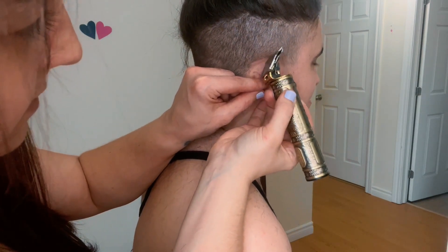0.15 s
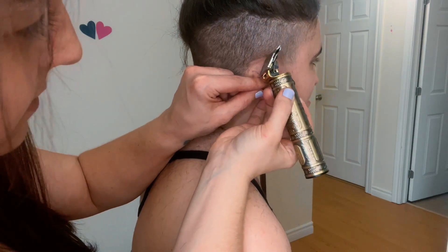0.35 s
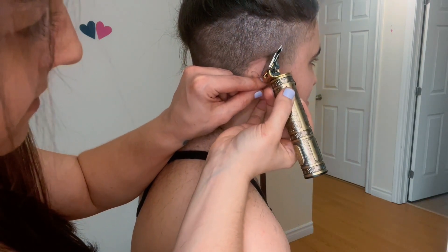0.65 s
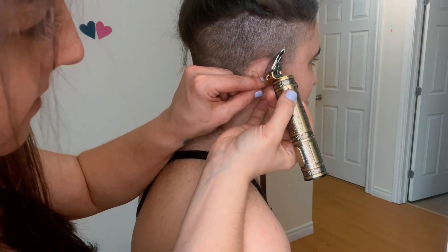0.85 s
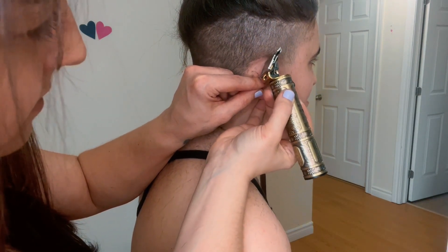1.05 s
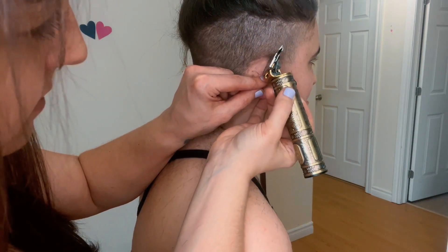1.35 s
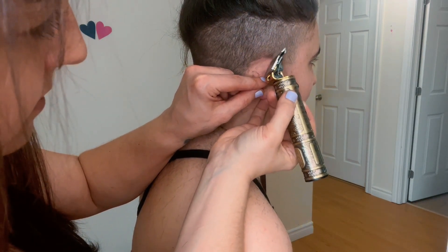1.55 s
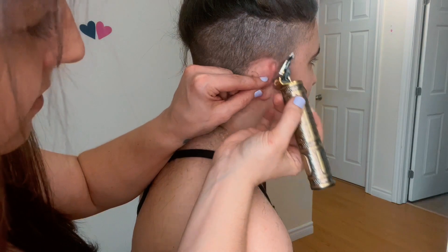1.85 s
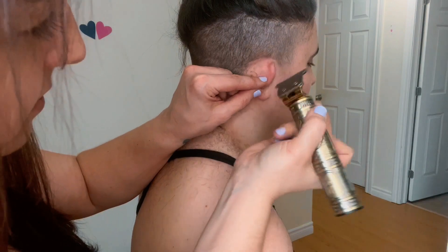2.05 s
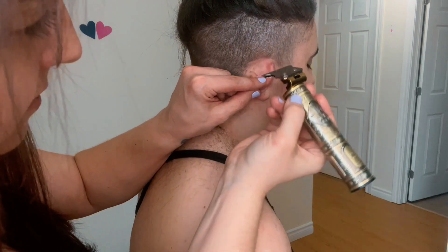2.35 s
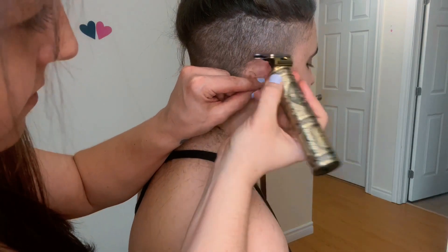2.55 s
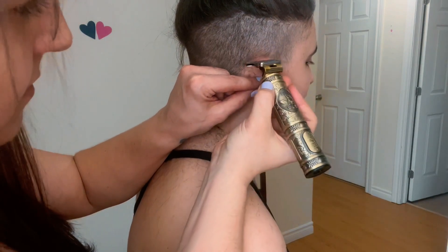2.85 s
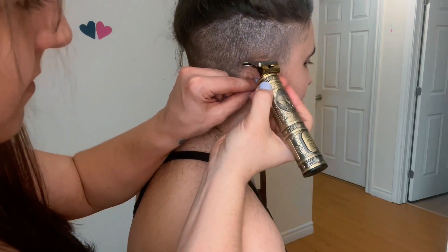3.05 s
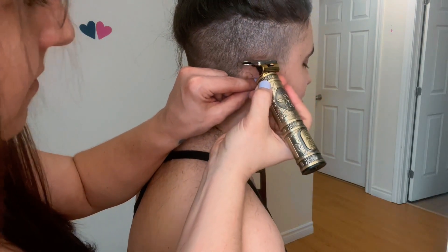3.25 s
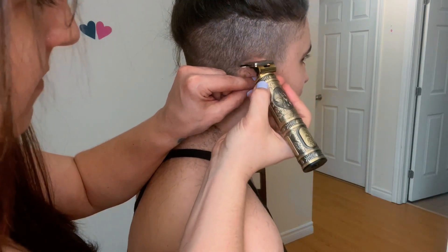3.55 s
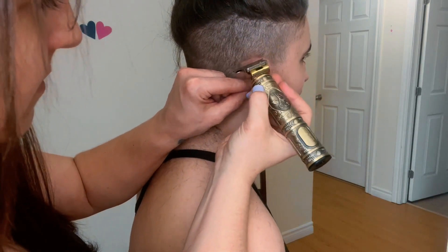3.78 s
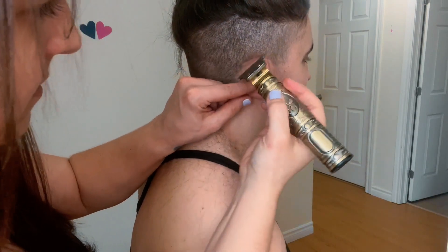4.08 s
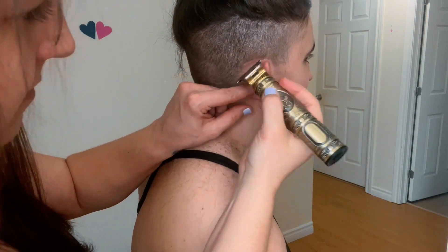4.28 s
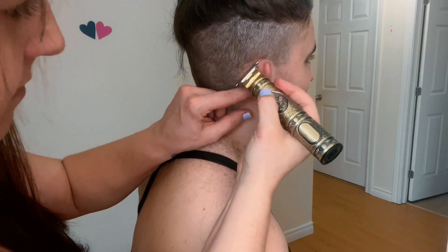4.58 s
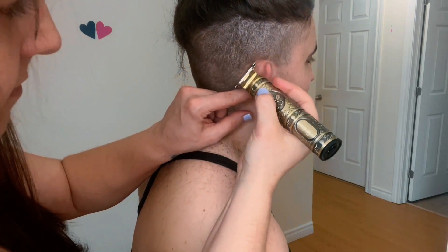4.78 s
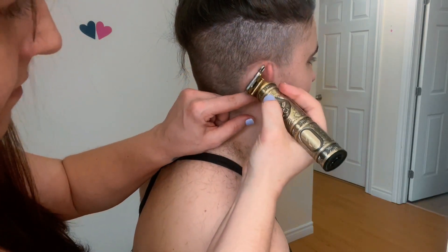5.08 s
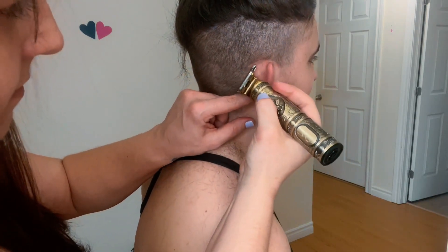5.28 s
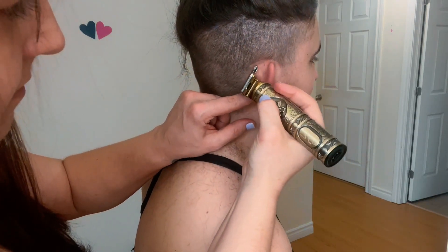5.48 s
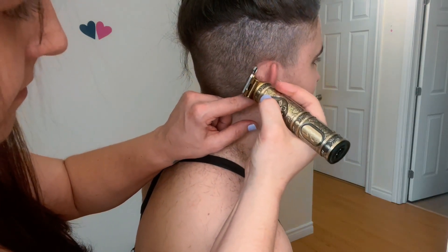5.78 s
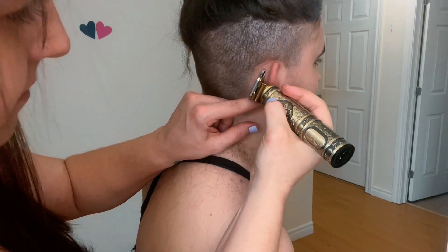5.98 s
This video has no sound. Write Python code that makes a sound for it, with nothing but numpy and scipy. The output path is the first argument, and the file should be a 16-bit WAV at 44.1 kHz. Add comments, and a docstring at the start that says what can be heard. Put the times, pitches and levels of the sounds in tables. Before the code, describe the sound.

Close, raspy electric trimmer buzz with a thin whine and fine hair snips, changing colour with each angle and briefly bogging down near the end.

```python
"""In a small room, a cordless hair trimmer runs close to the microphone, edging short hair around an ear.
The blade knocks at both ends of every motor turn, over rubbing steel, a thin tooth hiss and a whining drive.
The hand moves it from grip to grip, each with its own colour, and beams of sound sweep past on the way.
Hairs snip as noise clicks between the teeth; skin, hair and two firm pushes slow the motor.
Sliding echoes and a short diffuse tail answer from the walls, and the room rumbles steadily."""
import sys
import numpy as np
from scipy import signal
from scipy.fft import rfft, irfft, next_fast_len
from scipy.io import wavfile
from scipy.ndimage import uniform_filter1d, map_coordinates

SR = 44100
rng = np.random.default_rng(int(sys.argv[2]) if len(sys.argv) > 2 else 0)


def file_out(sig):
    """Save sig as 16-bit WAV at sys.argv[1]."""
    # one column per channel
    cols = np.atleast_2d(sig).T
    # limit, then scale
    lim = np.clip(cols, -1, 1)
    pcm = np.round(lim * 32767).astype(np.int16)
    wavfile.write(sys.argv[1], SR, pcm)


N = 270333
T = np.arange(N) / SR

# what blade and metal case radiate in each grip: f/Hz, relative level/dB
EDGE_ON = [(760, -28), (1140, -17.5), (1330, -10.5), (1720, -21), (1910, -7), (2290, -6), (2480, -22),
           (2670, -6.5), (2860, -23), (3620, -5), (3810, -17), (4000, -3.5), (4300, -12.5), (4950, -0.5),
           (5340, 1), (5600, -8.5), (6500, -3), (7100, -11.5), (7810, -14.5), (8500, -13.5), (9250, -12.5),
           (10290, -39)]
LIFTED = [(760, -25), (1900, -18), (2290, -3), (2490, -15), (2680, -13.5), (2950, -22), (3440, -1.5),
          (4010, -3), (4400, -1.5), (4970, -1.5), (5730, -9.5), (6500, -5), (7100, -10), (7600, -16),
          (8900, -15), (10320, -22)]
ABOVE_EAR = [(770, -25), (1530, -14.5), (1920, -12.5), (2110, -16), (2300, -8), (2490, -26), (3100, -18.5),
             (3400, -6.5), (3830, -9), (4020, -12.5), (4600, 1.5), (4980, 0), (5750, -8), (6130, 4.5),
             (6520, -2.5), (7200, -4.5), (7670, -15), (8400, -17.5), (8820, -12.5), (9400, -33),
             (10350, -44)]
BEHIND_EAR = [(760, -26.5), (1140, -25), (2060, -14.5), (2280, 0.5), (2470, -19), (2660, -18.5),
              (3050, -22), (3240, -5.5), (4000, -4), (4380, 3.5), (4950, -4), (5450, -9), (5900, -8),
              (6200, 0), (7040, -5.5), (7610, -16), (7900, -10), (8900, -19.5), (9520, -14.5), (10280, -31)]
LOW_ON_EAR = [(750, -31), (1130, -28), (1320, -9), (1510, -20), (1690, -13), (1880, -20), (2070, -7.5),
              (2450, -10), (3010, -19), (3750, -4), (4500, -1), (4950, -1), (5270, -14), (5500, -6),
              (5840, -7), (6050, -2), (6400, -3), (6800, -16), (7200, -8.5), (7650, -12), (8660, -14),
              (9410, -17), (9980, -10), (10170, -48)]
# grips, one turning into the next: held from t/s, held to t/s, colour,
# odd-harmonic change at the blade's resonance/dB, limp/0-1, blade level before scene gains/dB,
# left minus right/dB, blade turned flat/0-1, distance the hand has travelled/m
# (the last row's times run backwards: its glide aims for the first time but jumps home at the second)
GRIPS = [(0, 1.46, EDGE_ON, -5.5, 0.6, -36.5, 1.4, 0.13, 0.077),
         (2.03, 2.35, LIFTED, -7.5, 1, -34.5, 0.7, 0.33, 0.213),
         (2.58, 3.8, ABOVE_EAR, -1, .15, -33, 0.6, 1, 0.292),
         (4.02, 4.55, BEHIND_EAR, -13, .2, -31, 1.3, 0.65, 0.323),
         (5.15, 5.2, LOW_ON_EAR, -15.5, 0.29, -31.5, 0, 0.5, 0.382),
         (5.919, 5.6, LOW_ON_EAR, -17, 0, -31, 0, 0.32, 0.34)]
# tufts of hair being cut: t/s, length/s, snip level/dB, speed lost before the motor's lag/turns per s
TUFTS = [(0.545, 0.09, -42.5, .3), (0.626, 0.09, -42.5, .4), (0.92, .1, -56, .25), (1.334, 0.11, -50, .25),
         (1.732, 0.04, -49, .05), (1.957, .06, -50, .55), (2.45, .05, -50, .6), (2.63, .09, -55, .5),
         (3.57, 0.12, -48, .75), (3.993, 0.1, -52, .55), (5.052, 0.13, -56, .1), (5.91, 0.13, -45, .3)]
ECHO_DB = -10


def undb(db):
    """Decibels to gain."""
    return 10 ** (np.asarray(db) / 20)


def curves(table):
    """Each value column of a table that starts with t/s, as a curve in time."""
    s, *columns = np.transpose(table)
    return [np.interp(T, s, column) for column in columns]


def colour(points, hz):
    """Gain of an (f/Hz, level/dB) spectrum, interpolated over log frequency."""
    f, db = np.transpose(points)
    return undb(np.interp(np.log(hz + 1), np.log(f), db))


def unit(x):
    """Scale to rms 1."""
    return x / np.sqrt(np.mean(x ** 2))


def shaped(x, points):
    """Filter with an (f/Hz, level/dB) spectrum."""
    size = next_fast_len(N, True)
    hz = np.fft.rfftfreq(size, 1 / SR)
    return irfft(rfft(x, size) * colour(points, hz), size)[..., :N]


def drift(per_s):
    """A random wander with a spread near 1, straight between its knots."""
    knots = np.arange(0, T[-1] + 1, 1 / per_s)
    return np.interp(T, knots, rng.standard_normal(len(knots)))


def bump(s, length):
    """A flat-topped swell around a moment."""
    return np.exp(-(2 * (T - s) / length) ** 4)


def clicks(at, sizes):
    """Band-limited clicks at fractional sample positions."""
    taps = at.astype(int)[:, None] + np.arange(-8, 9)
    off = taps - at[:, None]
    shape = np.sinc(off) * np.cos(np.pi * off / 18) ** 2
    weights = sizes[:, None] * shape
    return np.bincount(np.clip(taps, 0, N).ravel(), weights.ravel(), N + 1)[:N]


def motor(push_hz, brisk, free_hz=95.85, lag_s=0.012, waver_per_s=22, waver_hz=0.2):
    """Skin, pushes and hair slow the motor; its pitch wavers in a move. Returns turns made and strain, 0-1."""
    # drag of the blade on the skin, deepening during the first push: t/s, speed lost/turns per s
    skin_drag = [(0, 0.68), (0.9, 0.62), (1.15, 0.4), (1.6, 0.45), (1.9, .2), (2.9, 0), (3.85, 0.2),
                 (4.2, 0.55), (4.8, 1), (4.97, 0.97), (5.06, 2.4), (5.135, 1.2), (5.2, 1.62), (5.8, 1.85),
                 (6, 2.6), (6.13, 2.45)]
    strain_from_hz, strain_span_hz = 0.53, 0.69  # lost speed where strain begins, and how gently it saturates
    follow = 1 / (lag_s * SR)
    load_hz = push_hz + sum(sag_hz * bump(s, length) for s, length, _, sag_hz in TUFTS)
    lost_hz = curves(skin_drag)[0] + signal.lfilter([follow], [1, follow - 1], load_hz)
    strain = np.tanh(np.maximum(lost_hz - strain_from_hz, 0) / strain_span_hz)
    turn_hz = free_hz - lost_hz + waver_hz * brisk * drift(waver_per_s)
    return np.cumsum(turn_hz) / SR, strain


def hand(brisk, tremor_per_s=8, tremor_m=0.0025, shake_m=0.027):
    """Level, pan, turn and travel of the tool follow the grips; its place trembles, more so in a move."""
    level_db, pan_db, flat, travel = curves([(s, *grip[5:]) for grip in GRIPS for s in grip[:2]])
    tremor = (tremor_m + shake_m * brisk) * drift(tremor_per_s)
    return level_db, pan_db, flat, travel + tremor


def strokes(turns, pressure):
    """Two unequal knocks a turn; pressure delays and unbalances them, hair jolts both.

    Returns the train and its push-pull twin, whose sign flips with every stroke."""
    jitter_s, drag_jitter_s, hair_jitter_s, drag_lag_s = 2e-6, 2e-6, 2e-5, 0.00031
    limp_db, press_limp_db, scatter_db = 0.5, 3.0, 0.7  # one stroke gains the limp, the other loses it
    stroke = np.arange(1, int(2 * turns[-1]) + 1)
    at = np.interp(stroke / 2, turns, np.arange(N))
    side = (-1.) ** stroke
    load, hair = pressure[at.astype(int)], hair_feed()[at.astype(int)]
    time_chance, size_chance = rng.standard_normal((len(at), 2)).T
    loose_s = jitter_s + drag_jitter_s * load + hair_jitter_s * hair / hair.max()
    at = at + SR * (time_chance * loose_s + drag_lag_s * load * side / 2)
    sizes = undb(scatter_db * size_chance + (limp_db + press_limp_db * load) * side)
    return unit(clicks(at, sizes)), unit(clicks(at, sizes * side))


def ring(points, lag_s, edge_hz=10100, size=2048, trail=.22):
    """One coloured knock: it rises faster than it dies; each frequency leaves the metal at its own lag."""
    hz = np.fft.rfftfreq(size, 1 / SR)
    top_cut = 1 / np.sqrt(1 + (hz / edge_hz) ** 80)
    bass_cut = hz / np.hypot(hz, 500)
    gain = colour(points, hz) * top_cut * bass_cut + 1e-3
    treble = (hz > 3000) & (hz < 10000)
    # part of the minimum-phase response puts some of the ringing behind the peak
    causal = 2 * trail * rfft(irfft(np.log(gain))[:size // 2], size).imag
    lags = np.interp(hz, np.linspace(0, SR / 2, len(lag_s)), lag_s)
    phase = causal - 2 * np.pi * np.cumsum(lags) * hz[1]
    level = np.sqrt(np.mean(gain[treble] ** 2))
    return np.roll(irfft(gain / level * np.exp(1j * phase)), size // 2)


def blade(turns, pressure, spread_s=0.00042, rub_db=-19, pressed_rub_db=-4, swell=1.0, count=56):
    """Knocks and the rubbing of steel on steel ring blade and case, in the colour of the present grip."""
    # colour of the blade pushed against the skin: f/Hz, relative level/dB
    pressed_colour = [(740, -30), (1080, -2.5), (1330, -5), (1550, -22), (1850, -11), (2040, -17),
                      (2410, -7), (2960, -18), (3890, -8), (4630, 2), (5650, -8), (6200, 4), (6760, -2),
                      (7590, -7), (9720, -10.5)]
    # how unlike the two strokes sound: f/Hz, odd against even harmonics/dB
    unlike_colour = [(900, 0.5), (2200, -2), (2700, 7.5), (3400, 6), (5000, -5), (6200, -6), (8000, 2)]
    # where the outward stroke outweighs the return: f/Hz, lead/0-1
    limp_lead = [(1000, .2), (2400, .7), (3600, .3), (5000, .15), (6300, .2), (8000, .6)]
    resonance_hz, resonance_octaves = 3840, 0.31  # each grip's odd-harmonic change is centred here
    glide_s = .22  # the shortest time in which one grip's colour turns into the next
    alike, unlike = strokes(turns, pressure)
    rub_gain = undb(rub_db + pressed_rub_db * pressure) * (1 + swell * np.cos(4 * np.pi * turns))
    source = alike + rub_gain * rng.standard_normal(N)
    lag_s = spread_s * rng.permutation(np.linspace(-2, 2, count))

    def radiate(points, scoop_db, limp):
        """What the two strokes share gives even harmonics; where they differ gives odd ones."""
        knock = ring(points, lag_s)
        hz = np.fft.rfftfreq(len(knock), 1 / SR)
        octaves = np.log2((hz + 1) / resonance_hz)
        scoop = undb(scoop_db * np.exp(-(octaves / resonance_octaves) ** 2))
        return_phase = np.arccos(np.clip(limp * np.interp(hz, *np.transpose(limp_lead)), 0, 1))
        odd_gain = colour(unlike_colour, hz) * scoop
        twin = irfft(rfft(knock) * odd_gain * np.exp(1j * return_phase))
        both = signal.oaconvolve(source, knock, "same") + signal.oaconvolve(unlike, twin, "same")
        return both / np.hypot(1, np.linalg.norm(twin) / np.linalg.norm(knock))

    times = np.ravel([grip[:2] for grip in GRIPS])
    free = 0
    for row, grip in zip(np.eye(len(GRIPS)), GRIPS):
        share = uniform_filter1d(np.interp(T, times, np.repeat(row, 2)), int(glide_s * SR))
        free = free + share * radiate(*grip[2:5])
    pressed = signal.oaconvolve(source, ring(pressed_colour, lag_s), "same")
    return (1 - pressure) * free + pressure * pressed


def lobes(x, brisk, size=512):
    """The tool beams each frequency its own way: weak beams drift past at random, strong ones sweep past."""
    # strong beams and hollows as the tool turns: t/s, length/s, centre f/Hz, width/Hz, gain/dB
    strong_beams = [(.92, .12, 7500, 2000, -5), (1.55, 0.22, 7360, 1400, -6), (1.6, .45, 8500, 700, 2),
                    (1.888, .12, 5460, 1800, -1), (1.983, 0.051, 5900, 2200, 2),
                    (2.05, 0.076, 4030, 1000, -5), (2.05, 0.034, 7400, 1500, -10),
                    (2.116, 0.079, 6700, 1000, 9), (2.23, 0.16, 3720, 905, 4.5),
                    (2.34, .08, 4550, 1000, -2), (2.35, .08, 6200, 700, 5.5), (2.23, .09, 5840, 1400, -1),
                    (2.44, .1, 5240, 900, 7), (2.6, 0.17, 8150, 2600, 6.5), (6.077, 0.25, 8400, 2000, 5.5)]
    lobe_hz, lobes_per_s, moving_lobes_per_s = 250, 3.5, 14  # weak beams' width; rate at rest, added in a move
    lobe_db, moving_lobe_db, narrow_beams_hz = 1.4, 1.1, 5000  # depth, added in a move; deeper above this
    hz, s, spectrum = signal.stft(x, SR, nperseg=size, noverlap=size * 3 // 4)
    f = hz[:, None]
    brisk = np.interp(s, T, brisk)
    passed = np.cumsum(lobes_per_s + moving_lobes_per_s * brisk) * s[1]
    pattern = rng.standard_normal((64, 64))
    beams = map_coordinates(pattern, np.meshgrid(hz / lobe_hz, passed, indexing="ij"), mode="mirror")
    depth_db = (lobe_db + moving_lobe_db * brisk) * np.clip(f / narrow_beams_hz, 1, 2)
    # the subtracted term offsets the power that random swings in dB would add
    weak_db = depth_db * (np.clip(beams, -2, 1.5) - depth_db * np.log(10) / 40)
    strong_db = 0
    for at, length, centre, width, db in strong_beams:
        strong_db = strong_db + db * np.exp(-(2 * (f - centre) / width) ** 2 - (2 * (s - at) / length) ** 2)
    beamed = spectrum * undb(weak_db + strong_db)
    return signal.istft(beamed, SR, nperseg=size, noverlap=size * 3 // 4)[1][:N]


def teeth_hiss(turns, hiss_db=-56.5, swell=0.35):
    """The sliding teeth add a thin, high hiss that swells with every stroke."""
    # colour of the hiss: f/Hz, relative level/dB
    fine_hiss = [(5000, -35), (8500, -10), (10000, -3), (11000, -7), (13500, 0), (14500, 0), (15200, -8)]
    gate = 1 + swell * np.cos(4 * np.pi * turns)
    return undb(hiss_db) * unit(shaped(gate * rng.standard_normal(N), fine_hiss))


def ears(x, count=60):
    """The close tool reaches the two microphones with another phase at each frequency."""
    # how far the phase differs between them: f/Hz, spread/radians
    ear_phase = [(500, 1.1), (2200, 0.057), (4000, 0.82), (8000, 1.3), (12000, .8)]
    size = next_fast_len(N, True)
    hz = np.fft.rfftfreq(size, 1 / SR)
    wander = np.interp(hz, np.linspace(0, SR / 2, count), rng.permutation(np.linspace(-2, 2, count)))
    phase = wander * np.interp(hz, *np.transpose(ear_phase))
    return irfft(rfft(x, size) * np.exp(.5j * np.array([phase, -phase])), size)[:, :N]


def walls(x, travel, nearest_s=0.002002, farthest_s=.014, count=8, tail_db=-14, t60_s=.35):
    """Echoes from head, shoulder and walls slide as the hand moves; a short diffuse tail follows."""
    shift_s = uniform_filter1d(travel, SR // 10, mode="nearest") / 343  # at the speed of sound, m/s
    t = np.arange(SR // 2) / SR
    channels = []
    for _ in range(2):
        paths = zip(rng.uniform(nearest_s, farthest_s, count), rng.uniform(-0.98, 1, count))
        echoes = sum(np.interp(T - delay - facing * shift_s, T, x) for delay, facing in paths)
        early = echoes / np.sqrt(count)
        tail = rng.standard_normal(len(t)) * np.exp(-np.log(1000) * t / t60_s)
        late = signal.fftconvolve(early, tail / np.linalg.norm(tail))[:N]
        channels.append(undb(ECHO_DB) * early + undb(tail_db) * late)
    return np.array(channels)


def whine(turns, flat, strain, brisk, ear_phase=0.3, pan_db=1.8, loose_turns=0.38):
    """Sine multiples of the turn rate from motor and crank; tool angle and strain shift their balance."""
    # the drive's harmonics: multiple of the turn rate, level before pan and waver/dB,
    # change with the blade turned flat/dB, change under full strain/dB
    harmonics = [(8, -60.5, -3.5, -3), (9, -56.5, -21, 4), (11, -64, 0, 17), (13, -54.5, -10, 4.5),
                 (15, -48.5, 2.5, 1), (17, -53, -4.5, -3), (21, -51, 9, -6), (23, -54.5, 4.5, 5)]
    waver_db, moving_waver_db, waver_per_s = 2.1, 2.5, 10
    left_right = np.array([[1], [-1]])
    out = 0
    for order, db, flat_db, strain_db in harmonics:
        phase = 2 * np.pi * (order * turns + loose_turns * rng.standard_normal())
        phase = phase + ear_phase * rng.choice([-1, 1]) * left_right
        waver = (waver_db + moving_waver_db * brisk) * drift(waver_per_s)
        level_db = db + flat_db * flat + strain_db * strain + waver
        out = out + undb(level_db) * np.sqrt(2) * np.sin(phase)
    return out * undb(left_right * pan_db / 2)


def rumble(mid_db=-33, pan_db=1.5):
    """Steady low noise, likely ventilation, booming in the room's resonances."""
    # colour of the noise: f/Hz, relative level/dB
    noise_colour = [(20, -33), (31, -31), (39, -8), (100, -7), (160, -12), (260, -8), (345, -13),
                    (480, -12.5), (570, -16), (700, -25), (1100, -30), (3000, -38), (9000, -35),
                    (15000, -105)]
    # room resonances that lift it: f/Hz, half-width/Hz, lift/dB
    room_modes = [(41.9, 5.6, 9.8), (67, 10.4, 3.4), (128.2, 29.6, 6.8), (194.5, 25.9, 15.9),
                  (232.4, 26.2, 14.1), (292.1, 18.8, 13.5), (317.4, 16.2, 13.6), (390.4, 40, 11),
                  (457.4, 18, 7.1), (487.6, 18.4, 8.1), (537, 4.9, 5.1)]
    # stereo width: f/Hz, side minus mid/dB
    side_colour = [(35, -24), (65, -2.5), (130, -13.5), (400, -7), (700, 3.5), (15000, -11)]
    size = next_fast_len(N, True)
    hz = np.fft.rfftfreq(size, 1 / SR)
    lift_db = sum(db * np.exp(-2 * ((hz - f) / width) ** 2) for f, width, db in room_modes)
    noise = rfft(rng.standard_normal((2, size)))
    mid, side = irfft(noise * colour(noise_colour, hz) * undb(lift_db), size)[:, :N]
    left_right = np.array([[1], [-1]])
    stereo = unit(mid) + left_right * shaped(unit(side), side_colour)
    return undb(mid_db + left_right * pan_db / 2) * stereo


def hair_feed():
    """How much hair meets the teeth, as a gain over time."""
    return sum(undb(db) * bump(s, length) for s, length, db, _ in TUFTS)


def snips(turns, hairs_per_s=1200, spread_db=4.0):
    """Single hairs snap as the teeth close on them: random clicks, densest at the stroke ends."""
    # colour of a snap: f/Hz, relative level/dB
    snip_colour = [(800, -8), (2000, 15), (3000, 12), (4000, 16), (5300, 18), (6500, 14), (8000, 9),
                   (10000, 7), (11500, -14), (15000, -24)]
    closing = (1 + np.cos(4 * np.pi * turns)) / 2
    struck = rng.random(N) < 2 * closing * hairs_per_s / SR
    snaps = struck * undb(spread_db * rng.standard_normal(N)) * rng.choice([-1, 1], N)
    return hair_feed() * unit(shaped(snaps, snip_colour))


def case(x, ring_hz=3932, width_hz=110):
    """A narrow resonance of the case sings out when the fingers loosen."""
    # how freely the case rings: t/s, added gain
    case_ring = [(.96, 0), (1.02, 1.1), (1.26, 0.97), (1.34, 0), (1.72, 0.69), (1.88, 2.2), (1.98, 1.3),
                 (2.05, 1.8)]
    return x + curves(case_ring)[0] * signal.lfilter(*signal.iirpeak(ring_hz, ring_hz / width_hz, SR), x)


def moves():
    """How briskly the hand swings the tool to a new place: each move swells and dies away."""
    # moves: middle t/s, length/s, briskness/0-1
    swings = [(2.201, 0.86, 0.98), (3.976, 0.43, 0.53)]
    return sum(size * bump(s, length) for s, length, size in swings)


def pushes():
    """Each push against the skin ramps up, holds and lets go. Returns pressure and the speed it costs."""
    # pushes: from t/s, release from t/s, ramp/s, pressure/0-1, speed lost before the motor's lag/turns per s
    presses = [(4.964, 5.113, 0.029, 0.74, 1.9), (5.836, 5.944, 0.053, 0.66, 0.88)]
    pressure, lost_hz = 0, 0
    for start, end, ramp, force, sag_hz in presses:
        held = np.clip((T - start) / ramp, 0, 1) - np.clip((T - end) / ramp, 0, 1)
        pressure = pressure + force * held
        lost_hz = lost_hz + sag_hz * held
    return np.clip(pressure, 0, 1), lost_hz


def scene(blade_db=3.0, press_db=2.5, clear_echo_db=6):
    """The trimmer, its echoes and the room; pressure hardens the knocks, swinging clear lifts the echoes."""
    brisk = moves()
    level_db, pan_db, flat, travel = hand(brisk)
    pressure, push_hz = pushes()
    turns, strain = motor(push_hz, brisk)
    buzz = undb(level_db + blade_db + press_db * pressure) * case(blade(turns, pressure))
    head = lobes(buzz, brisk) + snips(turns)
    echo = undb(clear_echo_db * brisk)
    direct = np.sqrt(1 - undb(2 * ECHO_DB) * (echo ** 2 - 1))  # gives up the power the early echoes gain
    near = ears(direct * head + teeth_hiss(turns)) + echo * walls(head, travel)
    near = near * undb(np.array([pan_db, -pan_db]) / 2)
    return near + whine(turns, flat, strain, brisk) + rumble()


def record(dry, top_hz=15100):
    """The recorder cuts the top with a steep low-pass."""
    return signal.sosfilt(signal.ellip(10, .2, 80, top_hz, fs=SR, output="sos"), dry)


dry = scene()
out = record(dry)
file_out(out)
```